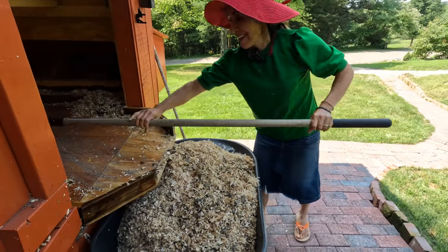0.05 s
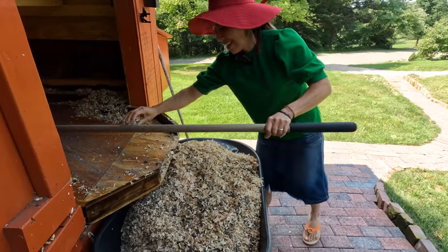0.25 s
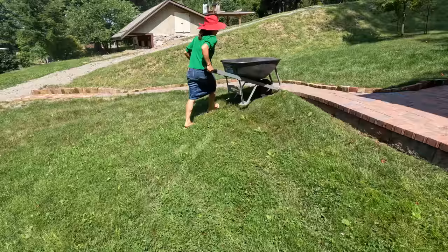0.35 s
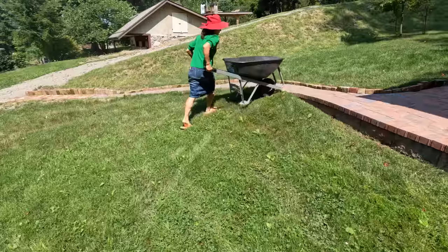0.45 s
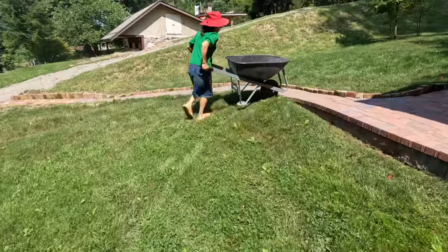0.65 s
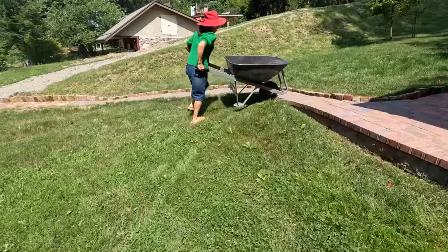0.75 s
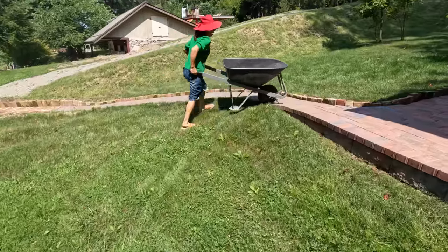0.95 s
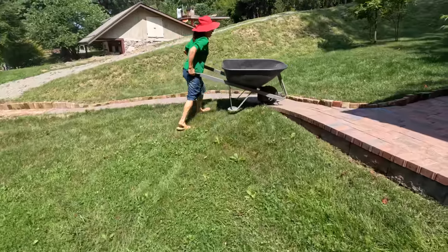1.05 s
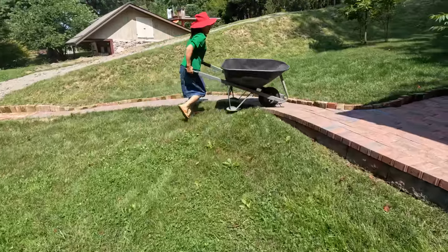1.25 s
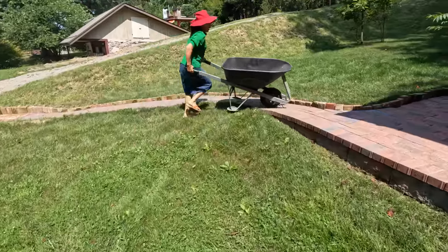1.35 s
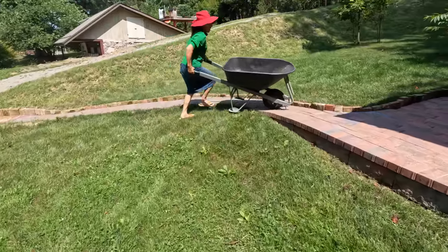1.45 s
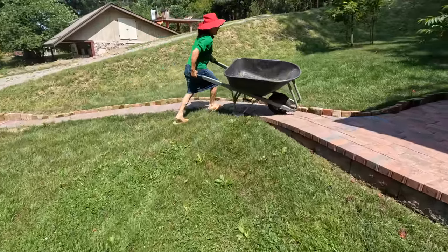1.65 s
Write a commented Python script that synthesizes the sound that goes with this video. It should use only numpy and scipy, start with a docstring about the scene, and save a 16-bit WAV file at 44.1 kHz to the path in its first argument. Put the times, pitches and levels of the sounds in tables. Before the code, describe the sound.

Loud hollow knocks of a scraper on wood, followed by a faint wheelbarrow rolling and ticking.

```python
"""Coop scraper, then wheelbarrow

A long-handled scraper slides through litter and knocks on a wooden coop, whose boards ring low and
hollow. Hard cut to a quiet yard: a wheelbarrow rolls over grass some way off, uneven ground shaking
its tray into a drone and its loose frame ticking, while insects chirp, buzz and sizzle."""
import sys
import numpy as np
from scipy import signal
from scipy.io import wavfile
from scipy.ndimage import uniform_filter1d

SR = 44100
rng = np.random.default_rng(int(sys.argv[2]) if len(sys.argv) > 2 else 0)


def transcribe(signal):
    """Save signal, clipped to [-1, 1], as a 16-bit WAV file at the path in sys.argv[1]."""
    frames = np.atleast_2d(signal).T
    limited = np.clip(frames, -1, 1)
    pcm = np.round(limited * 32767).astype(np.int16)
    wavfile.write(sys.argv[1], SR, pcm)


N = 74970
T = np.arange(N) / SR


def from_db(db):
    """Decibels to gain."""
    return 10 ** (np.asarray(db) / 20)

def rms_one(x):
    """Scale to unit rms."""
    return x / np.sqrt(np.mean(x ** 2) + 1e-20)

def fader(points):
    """Gain over time from (t/s, level/dB) points."""
    return from_db(np.interp(T, *np.transpose(points)))

def at_hz(points, hz):
    """Read a table on a log-frequency axis."""
    freqs, values = np.transpose(points)
    return np.interp(np.log(hz), np.log(freqs), values)

def decay(start, t60):
    """Hard attack, exponential tail."""
    return (T >= start) * from_db(-60 * np.clip(T - start, 0, 4 * t60) / t60)

def swell(start, hz, cycles=0.9):
    """A vibration builds up within its first cycle."""
    return np.clip((T - start) * hz / cycles, 0, 1)

def ring(start, hz, t60):
    """One struck mode."""
    return decay(start, t60) * swell(start, hz) * np.sin(2 * np.pi * hz * (T - start))

def bands(spectrum):
    """Noise shaped by a spectral density, as (f/Hz, band) pairs that add up to unit rms."""
    edges = np.geomspace(30, 17000, 23)
    white, out = rng.standard_normal((2, N + 4000)), []
    for k, (low, high) in enumerate(zip(edges, edges[1:])):
        hz = np.sqrt(low * high)
        if high > spectrum[0][0] and low < spectrum[-1][0]:
            sos = signal.butter(3, [low, high], "band", fs=SR, output="sos")
            band = signal.sosfilt(sos, white[k % 2])[-N:]
            out.append((hz, band * from_db(at_hz(spectrum, hz))))
    total = np.std(sum(band for _, band in out))
    return [(hz, band / total) for hz, band in out]

def noise(spectrum):
    """Coloured noise of unit rms."""
    return sum(band for _, band in bands(spectrum))

def resonance(hz, width_hz):
    """A resonance shaken at random, with steep skirts; unit rms."""
    edges = [max(hz - width_hz / 2, 20), hz + width_hz / 2]
    sos = signal.butter(2, edges, "band", fs=SR, output="sos")
    return rms_one(signal.sosfilt(sos, rng.standard_normal(2 * N))[N:])

def grain(spread_db):
    """Millisecond flutter of many small contacts."""
    flutter = rms_one(uniform_filter1d(rng.standard_normal(N), 60))
    return rms_one(from_db(spread_db * flutter))


# Fader rides for the slide and its closing rasp: t/s, level/dB
SLIDE_FADER = [(0, -49), (.04, -50.5), (.12, -56), (.21, -57), (.33, -67), (.385, -61.5), (.42, -54.5),
               (.47, -65.5), (.6, -79)]
RASP_FADER = [(.3, -100), (.37, -56), (.4, -59), (.455, -57), (.48, -64), (.56, -93)]
# Bright hiss of shavings: f/Hz, level/dB
LITTER_EQ = [(500, 0), (2000, -6), (5000, -12), (8500, 1), (11000, -1), (15000, -2.5)]
def litter():
    """Dry shavings hiss as they slide under the blade and end in a rasp."""
    hiss = fader(SLIDE_FADER) * noise(LITTER_EQ) * grain(spread_db=1)
    rasp = fader(RASP_FADER) * resonance(2500, width_hz=1300) * grain(spread_db=4)
    return hiss + rasp

# Room tone: f/Hz, level/dB
COOP_EQ = [(18, -57), (30, -31), (75, 3), (171, -16.5), (674, -18), (731, -18), (897, -23),
           (1100, -21), (1270, -24), (4000, -36), (5200, -57), (8800, -120)]
def coop_air():
    """A faint, dark bed inside the coop."""
    return from_db(-56) * noise(COOP_EQ)

# Scraper hits: t/s, wood level/dB, bass/dB, mids/dB, crack/dB, free ring/s
KNOCKS = [(0.2289, 3.5, 1, -4, 0.5, 0.037), (0.2804, 4, -1, 3, -7, 0.049),
          (0.3552, -5.5, -8.5, 3.5, -14, .012), (0.3647, -10, 7, -22.5, -22, 0.014),
          (0.3765, -11, 11, -11, -24, .02)]
# Contact noise: f/Hz, level/dB
CRACK_EQ = [(500, 3), (1500, 2.5), (3200, -7), (4300, -19), (6000, -15), (8000, -18), (15000, -19)]
def knocks():
    """Each blow cracks, trails grit and sets the blade and the wood ringing."""
    contact = noise(CRACK_EQ)
    out = planks(KNOCKS)
    for start, db, bass_db, mids_db, crack_db, free_s in KNOCKS:
        snap = from_db(-30.5) * decay(start, t60=0.038)
        grit = from_db(-32) * decay(start, t60=0.22)
        out += from_db(crack_db) * contact * (snap + grit)
        out += blade(start, crack_db)
        out += from_db(db) * boards(start, bass_db, mids_db, free_s)
    return out

def colour(hz, bass_db, mids_db):
    """The place of contact colours a blow: gain of a low shelf and a mid bell."""
    shelf = 1 / (1 + (hz / 296) ** 4)
    bell = np.exp(-.5 * (np.log2(hz / 945) / 0.4) ** 2)
    return from_db(bass_db * shelf + mids_db * bell)

# Woody body: f/Hz, level/dB
PLANK_EQ = [(60, -7), (110, 1), (300, 3.5), (800, -6), (1000, -8.5), (1650, -4), (2200, -26.5), (4000, -26),
            (15000, -52)]
# Its tail: f/Hz, t60/s
PLANK_DECAY = [(100, 0.55), (800, 0.29), (2000, 0.11), (12000, 0.15)]
def planks(blows):
    """Dense plank modes blur into noise that hangs on longest in the bass."""
    body, out = bands(PLANK_EQ), np.zeros(N)
    for start, db, bass_db, mids_db, _, _ in blows:
        for hz, band in body:
            envelope = decay(start, at_hz(PLANK_DECAY, hz)) * swell(start, hz)
            out += from_db(db) * colour(hz, bass_db, mids_db) * envelope * band
    return from_db(-24) * out

# Bright blade modes: f/Hz, level/dB, t60/s
BLADE_MODES = [(2750, -35, 0.067), (2906, -31.5, 0.035), (3196, -28.5, 0.054), (3420, -38.5, 0.047),
               (5770, -38.5, 0.061), (8290, -41.5, 0.075), (11900, -45, 0.08)]
def blade(start, crack_db):
    """The blade rings far more on a hard contact than on a glancing one."""
    return from_db(1.6 * crack_db) * sum(from_db(db) * ring(start, hz, t60) for hz, db, t60 in BLADE_MODES)

# Hollow coop modes: f/Hz, level/dB, t60/s
BOARD_MODES = [(82.2, -21.5, 0.22), (114, -34, 0.1), (145, -26.5, 0.28), (153, -20.5, 0.27),
               (198, -21.5, 0.23), (218, -12.5, .19), (253, -14.5, .21), (384, -26, .24), (467, -15.5, .16),
               (302, -25.5, 0.11), (348, -32, 0.13), (512, -27.5, 0.24), (584, -30.5, 0.22),
               (649.5, -26.5, .14), (753, -17, 0.065), (788.4, -20, 0.069), (854, -35, 0.42),
               (1115, -26, 0.048), (1306, -31, 0.08), (1532, -30, 0.069), (1787, -33, 0.074)]
def boards(start, bass_db, mids_db, free_s, damping_s=0.01):
    """The boards boom until the tool bears on the wood and chokes them."""
    boom = np.zeros(N)
    for hz, db, t60 in BOARD_MODES:
        lag_s = 0.0029 / (1 + (hz / 402) ** 4)  # the lows speak late
        boom += from_db(db) * colour(hz, bass_db, mids_db) * ring(start + lag_s, hz, t60)
    return boom * np.exp(-np.maximum(T - start - free_s, 0) / damping_s)

# Outdoor ambience: f/Hz, level/dB
YARD_EQ = [(30, -8), (60, -2), (110, 3), (300, -3), (480, -7.5), (750, -12.5), (1400, -17.5), (2200, -23),
           (3600, -29.5), (4800, -28), (6000, -33), (7500, -28.5), (10500, -38.5), (15000, -35)]
def yard_air():
    """A quiet, steady open-air bed."""
    return from_db(-52) * noise(YARD_EQ)

# Ride on the drone: t/s, level/dB
ROLL_FADER = [(.386, -53), (.47, -49), (.56, -49.5), (.8, -50.5), (.955, -56), (1.0, -43), (1.1, -41),
              (1.17, -44.5), (1.42, -56.5), (1.56, -48), (1.7, -43)]
# Tray resonances: f/Hz, level/dB, width/Hz
TRAY_MODES = [(118.2, -1.5, 16), (187.55, 1.5, 8.5), (223.1, -5, 17), (255.3, -4.5, 9.6), (399.7, -7, 41),
              (545, -14.5, 100)]
# The wheel meets a bump: t/s, level/dB
BUMPS = [(0.45, -42), (0.616, -45), (0.967, -34.5), (1.039, -43)]
def tray():
    """Uneven ground shakes the wheelbarrow's tray into a drone; bumps set it ringing."""
    drone = rms_one(sum(from_db(db) * resonance(hz, width) for hz, db, width in TRAY_MODES))
    out = fader(ROLL_FADER) * drone
    for start, bump_db in BUMPS:
        for hz, db, _ in TRAY_MODES:
            tyre = 1 / (1 + (hz / 220) ** 4)  # the soft tyre passes only the low modes
            out += from_db(bump_db + db) * tyre * ring(start, hz, t60=0.35)
    return out

# Ride on the rustle: t/s, level/dB
RUSTLE_FADER = [(.386, -49.5), (.45, -53.5), (.56, -63.5), (.72, -70), (.83, -59), (.92, -61),
                (1.02, -52.5), (1.11, -62.5), (1.19, -63), (1.34, -61.5), (1.48, -68), (1.58, -61),
                (1.64, -52.5), (1.7, -58.5)]
# Swish accents: t/s, half-width/s, level/dB
SWISHES = [(0.637, 0.025, -63.5), (1.02, 0.017, -79), (1.11, .025, -55), (1.243, 0.023, -56.5)]
# Tone of the rustle and the swish: f/Hz, level/dB
RUSTLE_EQ = [(300, -0.5), (700, 0.5), (2000, -2), (4000, -15.5), (8000, -21.5), (15000, -24)]
SWISH_EQ = [(1200, 6.5), (2200, 5), (4700, -3.5), (7000, -10.5), (15000, -17)]
def grass():
    """Grass rustles and swishes as the wheel rolls through."""
    rustle = fader(RUSTLE_FADER) * noise(RUSTLE_EQ)
    accents = sum(from_db(db) * np.exp(-((T - peak) / half) ** 2) for peak, half, db in SWISHES)
    return (rustle + accents * noise(SWISH_EQ)) * grain(spread_db=3.5)

# Ride on the sizzle: t/s, level/dB
SIZZLE_FADER = [(.5, -72), (.8, -82), (.93, -70), (1.05, -88), (1.28, -71), (1.5, -90)]
def insect_sizzle():
    """A very high insect swells and fades."""
    return fader(SIZZLE_FADER) * resonance(13200, width_hz=1800)

# Ride on the chirps: t/s, level/dB
CHIRP_FADER = [(.7, -73.5), (.83, -69), (.96, -76), (1.06, -78), (1.17, -73), (1.3, -66.5), (1.55, -66),
               (1.7, -70)]
def insect_chirps(first_s=0.685, every_s=0.0665, length_s=0.025, sag_hz_per_s=7000):
    """A second insect repeats a short falling chirp."""
    age = (T - first_s) % every_s
    gate = np.sin(np.pi * np.minimum(age / length_s, 1)) * (T > first_s)
    sag = np.exp(-1j * np.pi * sag_hz_per_s * (age - length_s / 2) ** 2)
    carrier = signal.hilbert(resonance(8120, width_hz=100))
    tone = np.sqrt(2) * np.cos(np.angle(carrier * sag))  # phase only, for an even level
    return fader(CHIRP_FADER) * gate * tone

# Buzz phrases: t/s, length/s, level/dB
BUZZES = [(.76, 0.24, -70), (1.14, .22, -68)]
def insect_buzz():
    """A third insect buzzes lower, in longer arched phrases."""
    phrases = np.zeros(N)
    for start, length, db in BUZZES:
        progress = np.clip((T - start) / length, 0, 1)
        phrases += from_db(db) * np.sqrt(np.abs(np.sin(np.pi * progress)))
    return phrases * resonance(4880, width_hz=200)

# Tick cues: t/s, level/dB, rattle t60/s, treble/dB
TICKS = [(1.162, -49.5, 0.022, -9), (1.2105, -41.5, 0.014, -25), (1.2866, -49.5, 0.014, -31),
         (1.3223, -39, 0.011, -25), (1.335, -44.5, 0.013, -21), (1.381, -46.5, .012, -27),
         (1.5513, -44.5, 0.025, -29), (1.634, -39, 0.089, -13), (1.6525, -33.5, .018, -9)]
# Frame modes: f/Hz, level/dB, t60/s
FRAME_MODES = [(1050, -9, 0.0065), (1850, 6, 0.0079), (2300, -2, 0.0078), (3050, -4.5, 0.0075)]
# Body and top end of the rattle: f/Hz, level/dB
RATTLE_EQ = [(400, -13), (900, -7.5), (1400, -5), (1900, -6), (3000, -4.5), (4500, -34), (12000, -56)]
RATTLE_TOP_EQ = [(1800, -13), (2800, 14), (4200, -1), (5500, 4.5), (10000, 4), (15000, -4)]
def frame_ticks():
    """Short dry clicks of the wheelbarrow's loose frame, each with a brief rattle."""
    body, treble = from_db(-3) * noise(RATTLE_EQ), noise(RATTLE_TOP_EQ)
    out = np.zeros(N)
    for start, tick_db, rattle_t60, treble_db in TICKS:
        click = sum(from_db(db) * ring(start, hz, t60) for hz, db, t60 in FRAME_MODES)
        rattle = decay(start, rattle_t60) * (body + from_db(treble_db) * treble)
        out += from_db(tick_db) * (click + rattle)
    return out


def scene():
    """Hard cut from coop to yard; the litter's tail carries across it."""
    cut_s, crossfade_s = 0.3855, 0.0018
    outside = np.clip((T - cut_s) / crossfade_s + .5, 0, 1)
    coop = knocks() + coop_air()
    wheelbarrow = tray() + grass() + frame_ticks()
    insects = insect_sizzle() + insect_chirps() + insect_buzz()
    yard = yard_air() + wheelbarrow + insects
    return (litter() + (1 - outside) * coop + outside * yard)[None]

def record(dry):
    """Master chain: soft clip, low cut, steep high cut."""
    ceiling, low_cut_hz, high_cut_hz = 0.51, 35.4, 15900
    rounded = dry / (1 + (dry / ceiling) ** 4) ** (1 / 4)
    thinned = signal.sosfilt(signal.butter(2, low_cut_hz, "high", fs=SR, output="sos"), rounded)
    return signal.sosfilt(signal.ellip(10, .1, 80, high_cut_hz, fs=SR, output="sos"), thinned)


dry = scene()
out = record(dry)
transcribe(out)
```